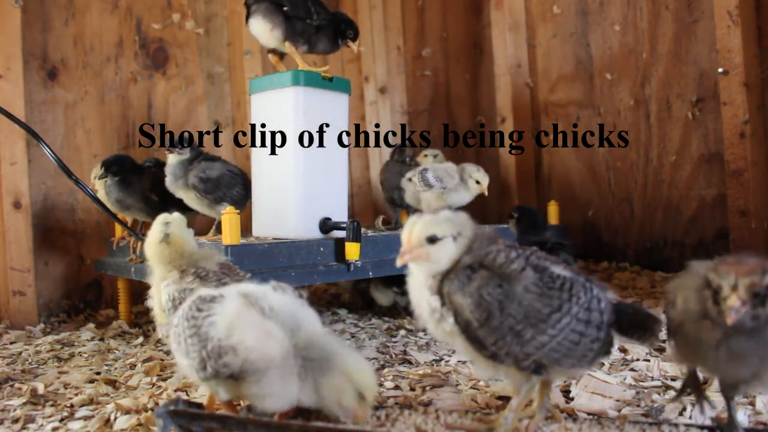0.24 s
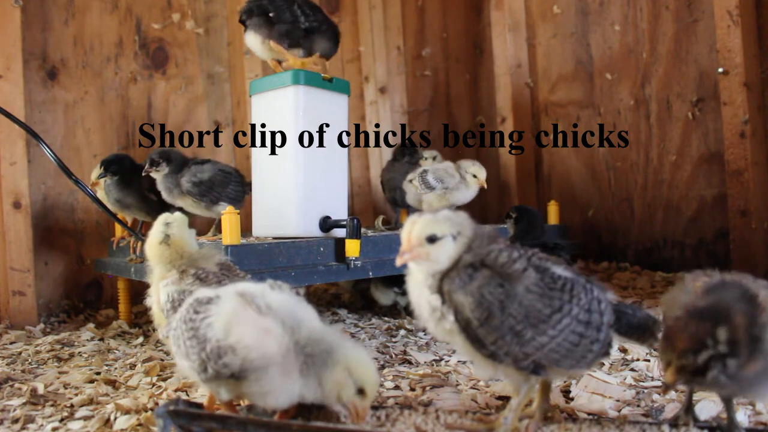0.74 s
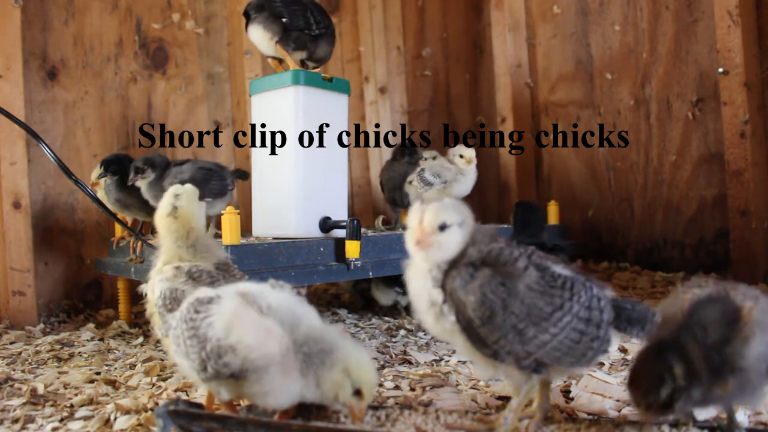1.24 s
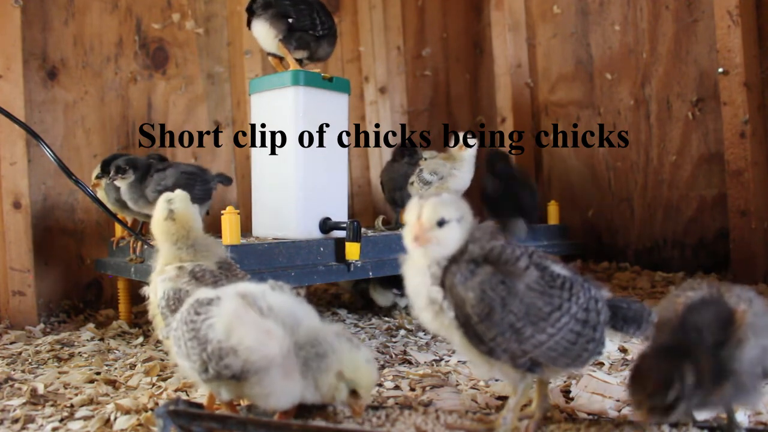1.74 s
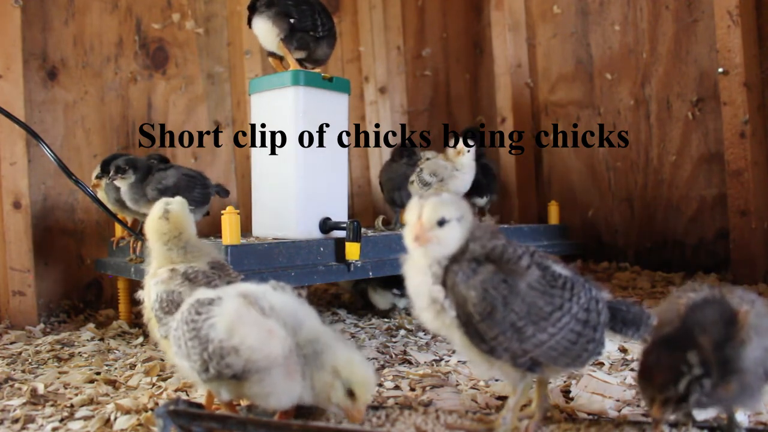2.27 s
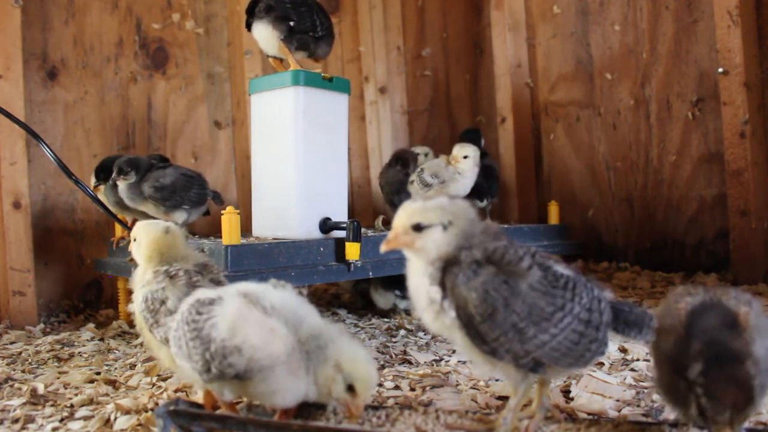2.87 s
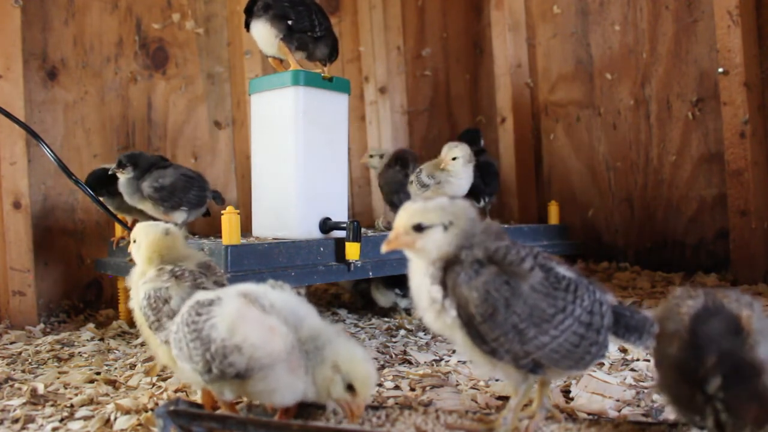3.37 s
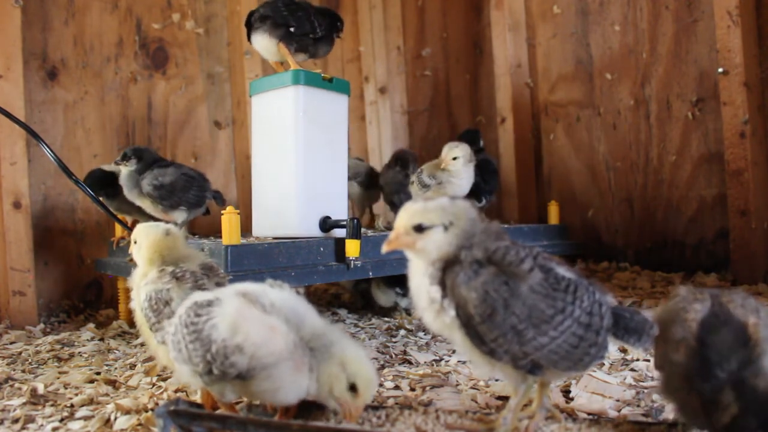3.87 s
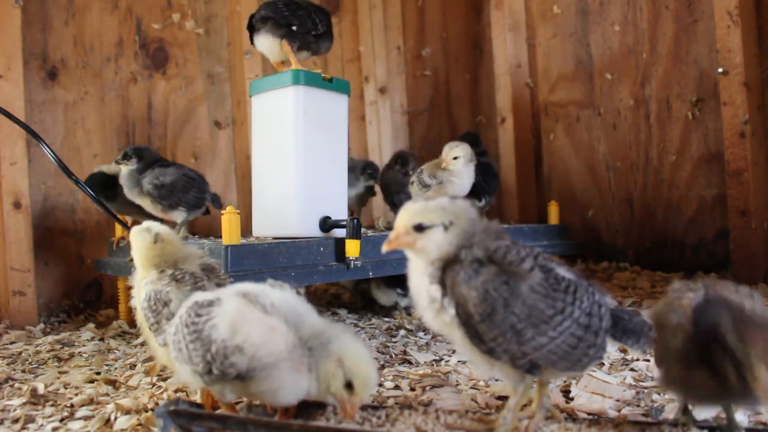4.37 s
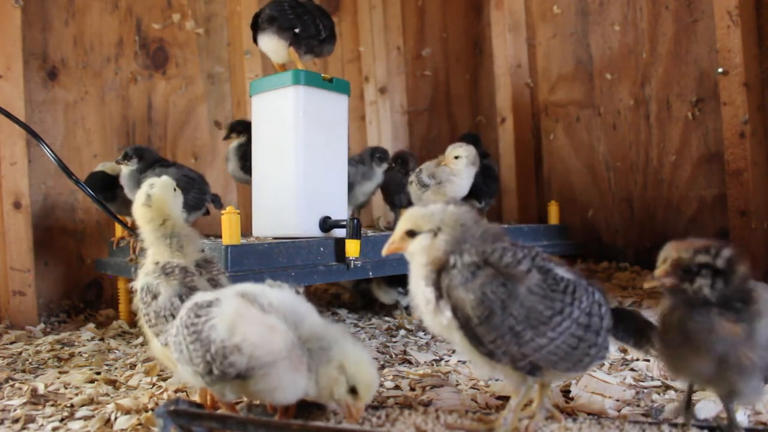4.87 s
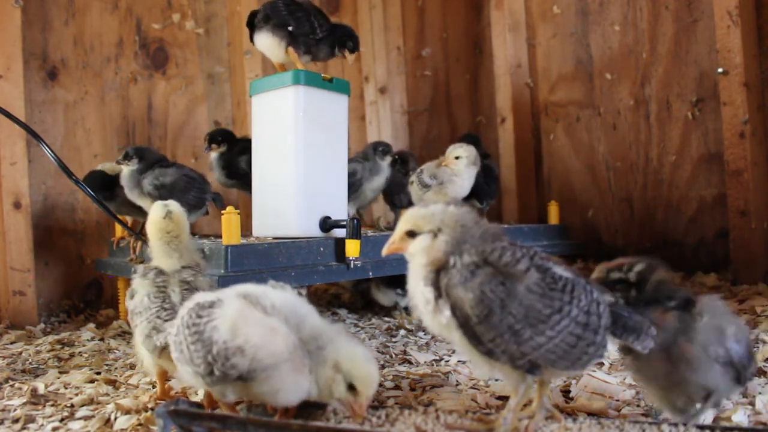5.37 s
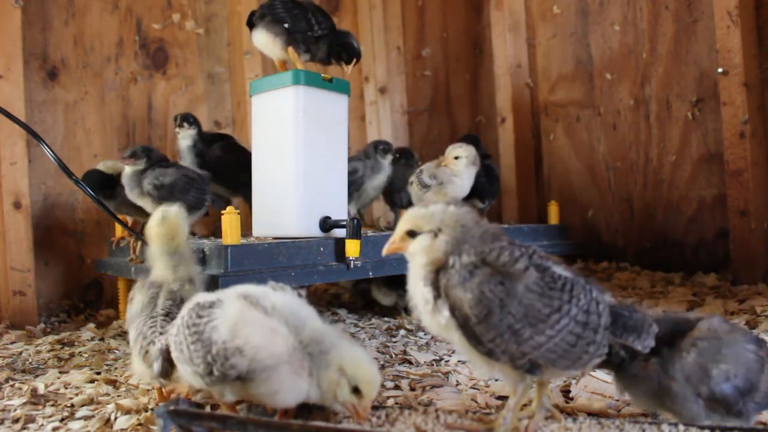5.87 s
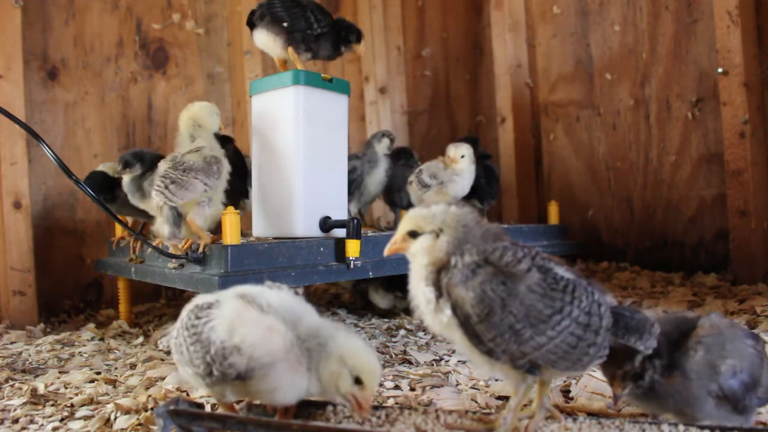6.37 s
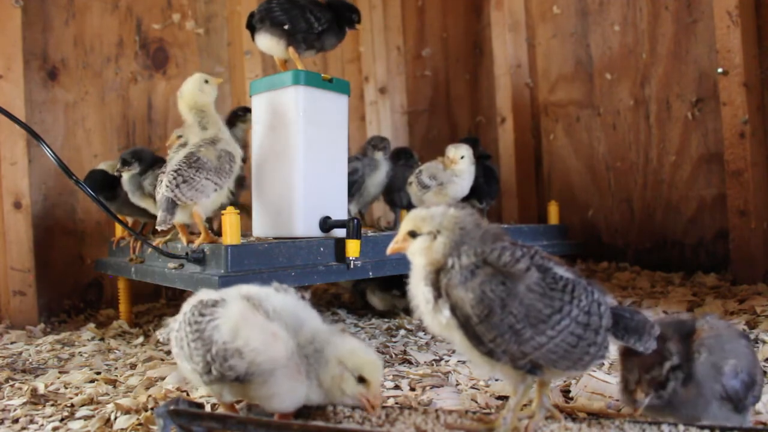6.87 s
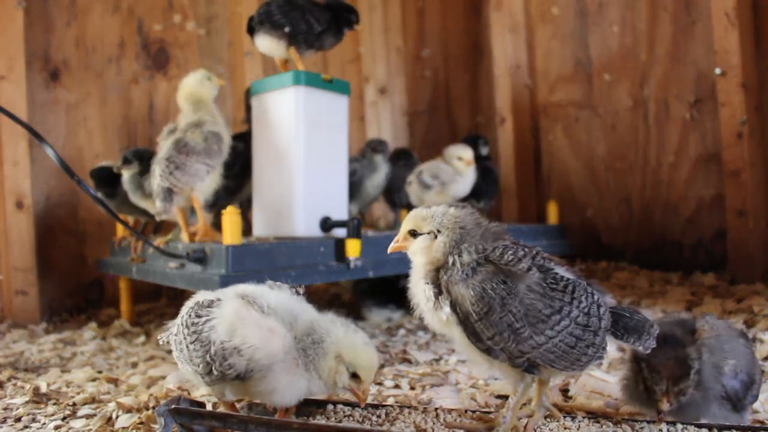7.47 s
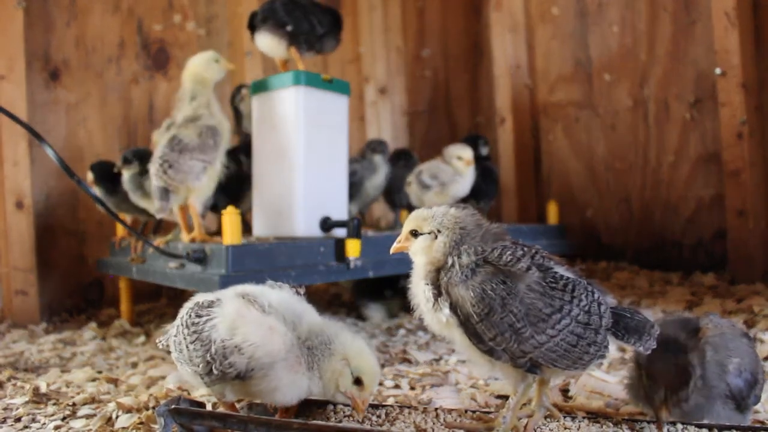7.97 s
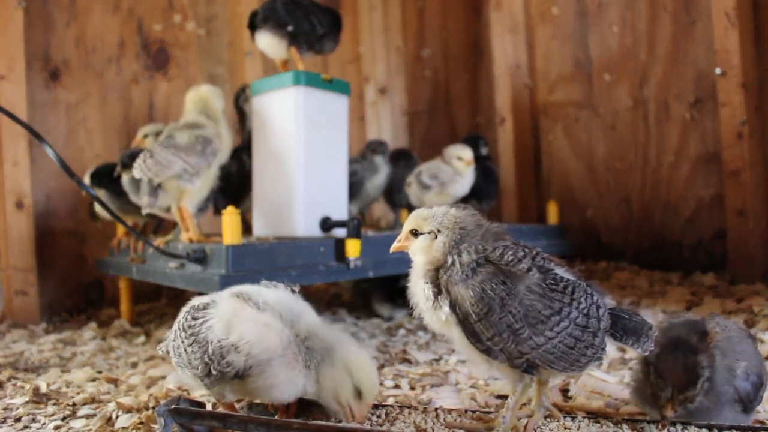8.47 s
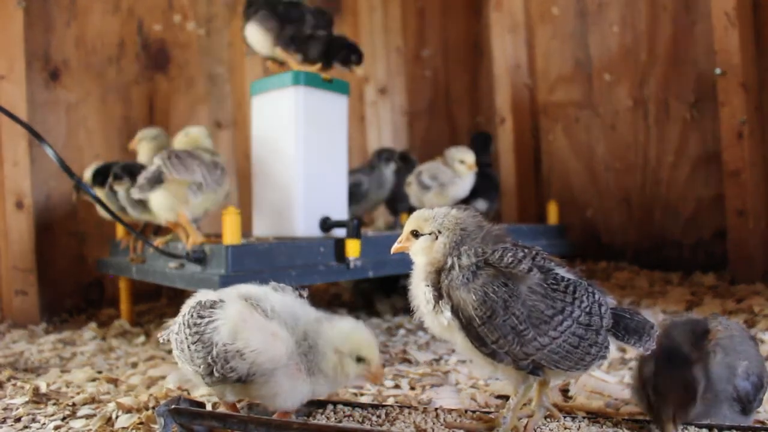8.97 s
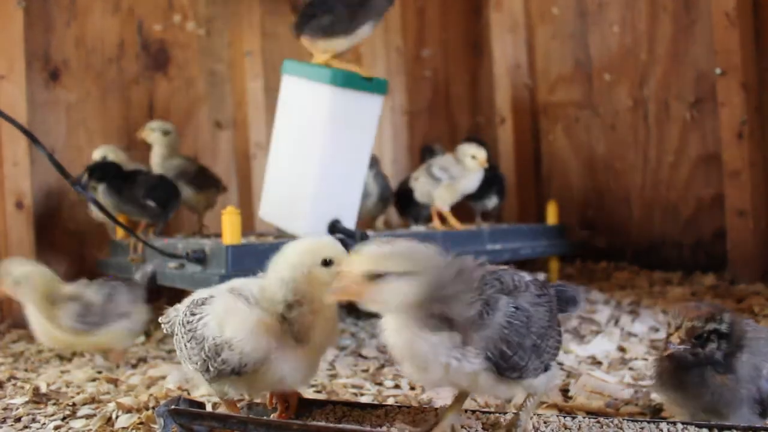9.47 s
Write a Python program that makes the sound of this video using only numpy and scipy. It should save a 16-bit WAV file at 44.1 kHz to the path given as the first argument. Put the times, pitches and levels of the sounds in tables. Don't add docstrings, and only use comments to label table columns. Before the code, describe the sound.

Mostly quiet chick bustle on dry litter, close up with a short woody room echo. Uneven rustles, sharp ticks, small tray taps and dull footfalls continue for almost nine seconds, with sparse falling chirps. Outside, a far bird calls softly, an insect buzzes twice and a motor hums low. Then sudden flapping, bright feather ticks, hollow knocks and loud arching squeals run to the cut.

```python
import sys
import numpy as np
from scipy import signal
from scipy.fft import rfft, irfft
from scipy.io import wavfile
from scipy.ndimage import uniform_filter1d, map_coordinates

SR = 44100
rng = np.random.default_rng(int(sys.argv[2]) if len(sys.argv) > 2 else 0)


def materialize(psi):
    bounded = np.clip(np.atleast_2d(psi).T, -1, 1)
    quanta = np.round(bounded * 32767).astype(np.int16)
    wavfile.write(sys.argv[1], SR, quanta)


def invert_db(level):
    return 10 ** (np.asarray(level, dtype=float) / 20)


N = 429093


def evened(x):
    return x / np.sqrt(np.mean(x ** 2) + 1e-20)


def read(points, hz):
    f, value = np.transpose(points)
    return np.interp(np.log(hz + 1), np.log(f + 1), value)


def add(mix, s, sound):
    part = mix[round(s * SR):][:len(sound)]
    part += sound[:len(part)]


def follow(rows):
    s, *columns = np.transpose(rows)
    t = np.arange(s[0], s[-1], 1 / SR)
    return [t] + [np.interp(t, s, c) for c in columns]


def coloured(x, spectrum):
    gain = invert_db(read(spectrum, np.fft.rfftfreq(len(x), 1 / SR)))
    return evened(irfft(rfft(x) * gain, len(x)))


def wander(n, hz):
    knots = rng.standard_normal(int(n / SR * 400) + 8)
    return map_coordinates(knots, [np.arange(n) * np.clip(hz, 1, 400) / SR], order=2)


def phase(hz):
    return 2 * np.pi * np.cumsum(hz) / SR


def ring(hz, t60):
    t = np.arange(SR // 4) / SR
    return invert_db(-60 * t / t60) * np.sin(2 * np.pi * hz * t)


def crackle(n, per_s, spread_db, hiss):
    size = invert_db(spread_db * np.minimum(rng.exponential(1, n), 4)) * rng.standard_normal(n)
    return size * (rng.random(n) < per_s / SR) + hiss * rng.standard_normal(n)


def whistle(hz, db, octave_db):
    turn = phase(hz)
    tremor_db = 3 * wander(len(hz), 224.3)
    return invert_db(db + tremor_db) * (np.sin(turn) + invert_db(octave_db) * np.sin(2 * turn))


# t/s, level/dB
ECHOES = [(.0021, -71), (.0047, -43), (.0073, -27), (0.0122, -26.5), (.0168, -22), (.0235, -45)]
# f/Hz, t60/s
SHED = [(90, 0.42), (300, 0.15), (1000, 0.11), (4000, 0.12), (12000, 0.083)]


def shed(x, tail_db):
    taps = np.zeros(SR // 2)
    at = np.arange(200, SR // 2 - 20, 20)
    taps[at + rng.integers(0, 20, len(at))] = rng.choice([-1., 1.], len(at))
    hz, t, z = signal.stft(taps, SR, nperseg=256)
    tail = signal.istft(z * invert_db(-60 * t / read(SHED, hz)[:, None]), SR, nperseg=256)[1]
    room = invert_db(tail_db) * tail / np.linalg.norm(tail)
    direct = (0.0015, 0.038)
    for k, (s, db) in enumerate([direct, *ECHOES]):
        add(room, s, np.array([(-1) ** k * invert_db(db)]))
    return signal.fftconvolve(x, room / np.linalg.norm(room))[:N]


# f/Hz, level/dB per Hz
FLOOR = [(20, -5.5), (66, 3), (92, 4), (135, -4), (335, -12.5), (700, -11), (2400, -23.5), (15800, -23)]


def floor():
    return invert_db(-55 + 0.054 * wander(N, 3.6)) * coloured(rng.standard_normal(N), FLOOR)


# t/s, f/Hz, level/dB
MOTOR = [
    (3.1, 49.97, -66),
    (3.45, 40.05, -58),
    (3.7, 43.5, -62),
    (6.2, 42.11, -56.5),
    (8.53, 42.42, -55.5),
    (8.86, 40.9, -50),
    (9.73, 41.5, -54),
]


def motor():
    out = np.zeros(N)
    t, hz, db = follow(MOTOR)
    octave_db = -55 + 0.085 * (db + 63)
    turn = phase(hz)
    hum = invert_db(db + 5.5) * np.sin(turn)
    octave = invert_db(octave_db + 0.5 + 1.47 * wander(len(t), 9.4)) * np.sin(2 * turn)
    add(out, t[0], (hum + octave) * np.clip((t - t[0]) / 0.63, 0, 1))
    return out


# t/s, length/s, f/Hz, level/dB
INSECT = [
    (3.032, 0.28, 6706, -64),
    (3.464, 0.37, 6515, -63),
]


def insect():
    out = np.zeros(N)
    for s, length, start_hz, db in INSECT:
        t = np.arange(s, s + length, 1 / SR)
        hz = start_hz - 1100 * (t - s) ** 2
        db = db - 9 * (1 - (t - s) / length) ** 2
        fuzz = evened(uniform_filter1d(uniform_filter1d(rng.standard_normal(len(t)), 50), 30))
        add(out, t[0], invert_db(db + 5.0) * fuzz * np.sin(phase(hz)) * signal.windows.tukey(len(t), .3))
    return out


# t/s, length/s, top of the second harmonic f/Hz, level/dB, place of the swell (0-1)
FAR_BIRD = [(0.02, 0.228, 1860, -59, 0.5), (0.345, 0.14, 1893, -53.5, 0.74), (0.52, 0.05, 1846, -63, 0.3),
            (2.025, 0.23, 1871, -56, 0.43), (2.335, 0.17, 1886, -55.5, 0.7),
            (2.53, 0.041, 1850, -60.5, 0.28), (2.23, 0.12, 1830, -63.5, 0.45), (4.44, 0.11, 1849, -60, 0.5),
            (0.24, 0.11, 1796, -67.5, 0.4), (4.23, 0.225, 1853, -57, 0.3), (4.52, 0.2, 1864, -56.5, 0.6),
            (7.065, 0.24, 1874, -60, .6), (7.385, 0.19, 1860, -57.5, 0.58)]
# multiple, level/dB
FAR_BIRD_ORDERS = [(2, 1), (3, -3), (6, -12), (7, -14)]


def far_bird():
    out = np.zeros(N)
    for s, length, top_hz, db, swell in FAR_BIRD:
        t = np.arange(s, s + length, 1 / SR)
        u = (t - s) / length
        below_top = np.interp(u, [0, 0.43, 0.813, 1], [0.0206, 0, 0.03133, 0.03133])
        hz = top_hz * (1 - below_top)
        db = db - 10 * (u - swell) ** 2 * 2
        turn = phase(hz * (1 + 0.0052 * wander(len(t), 24.6))) / 2
        note = sum(invert_db(d + 3.3 * wander(len(t), 105)) * np.sin(k * turn) for k, d in FAR_BIRD_ORDERS)
        add(out, t[0], invert_db(db - 0.5) * note * signal.windows.tukey(len(t), .1))
    return shed(out, tail_db=-2)


# t/s, level/dB
BUSTLE = [(0, -55.5), (0.6, -56.5), (1.4, -58.5), (1.75, -50), (2.07, -60.5), (2.45, -52.5), (3, -57.5),
          (3.42, -62), (3.7, -59.5), (4.3, -53.5), (5.2, -54), (5.75, -51), (6.3, -56), (6.75, -51.5),
          (7.15, -52), (8, -57), (8.3, -61.5), (8.75, -54)]
# t/s of the peak, level/dB, length/s
RAKES = [(0.335, -49.5, 0.154), (0.738, -49, 0.285), (1.785, -47.5, 0.061), (2.675, -51, 0.13),
         (2.908, -51, 0.11), (4.087, -44.5, 0.083), (4.748, -50, 0.052), (5.114, -45, 0.07),
         (5.795, -48, 0.032), (6.044, -45, 0.07), (6.442, -49, 0.135), (6.627, -42, 0.038),
         (6.719, -51, 0.17), (6.871, -43.5, 0.036), (8.143, -46.5, 0.257), (8.833, -48.5, 0.234)]
# f/Hz, level/dB per Hz
SHAVINGS = [(290, 3.5), (500, -2), (1030, 2), (2420, 3.5), (3670, 2), (8010, 1.5), (12700, -3.5),
            (15800, -3.5)]


def stirring():
    t = np.arange(N) / SR
    power = invert_db(np.interp(t, *np.transpose(BUSTLE))) ** 2 * (t < 8.9)
    rise = 0.223
    for s, db, length in RAKES:
        away = np.maximum((s - t) / rise, (t - s) / (1 - rise)) / length
        power = power + invert_db(db - 11.5 * away) ** 2
    grains = coloured(crackle(N, 6000, spread_db=4.5, hiss=0.846), SHAVINGS)
    return np.sqrt(power) * invert_db(2.17 * wander(N, 60)) * grains


# t/s, peak level/dB, centre f/Hz
SNAPS = [(0.2976, -11.5, 2500), (0.7228, -33, 5470), (0.737, -25.5, 7760), (0.7905, -21.5, 2400),
         (0.852, -25.5, 3160), (1.601, -21, 4470), (1.611, -29, 7650), (1.6523, -20, 7250),
         (1.732, -26, 7890), (1.7904, -15.5, 6230), (2.329, -25, 3660), (4.0906, -35, 3450),
         (4.728, -32, 5600), (5.098, -26.5, 4620), (5.1215, -40, 3967), (5.808, -28.5, 7760),
         (6.0641, -24.5, 6680), (6.158, -28, 10540), (6.3669, -26.5, 10470), (6.627, -20.5, 2650),
         (6.865, -46, 3740), (7.876, -34, 2680), (7.9866, -30, 6460), (8.091, -36.5, 3400),
         (8.1598, -26, 4330), (8.257, -20.5, 5120), (8.45, -28, 4070), (3.262, -33, 3000),
         (3.463, -31, 2300), (3.68, -35, 3200), (3.887, -32, 4000), (4.152, -34, 2600), (4.18, -31, 2400),
         (4.228, -37, 2600)]


def snaps():
    out, t = np.zeros(N), np.arange(800) / SR
    click = 1. * (t == 0)
    tick = signal.lfilter(*signal.butter(1, 900, "high", fs=SR), click)
    for s, db, hz in SNAPS:
        burst = rng.standard_normal(800) * invert_db(-9.0 - 60 * t / 0.04) + 3.2 * click
        band = signal.butter(2, np.clip([hz * 0.55, hz * 1.406], 300, 20000), "band", fs=SR)
        add(out, s, invert_db(db - 5.5) * (signal.lfilter(*band, burst) + invert_db(0.5) * tick))
    return out


# f/Hz, level/dB, t60/s
BOARDS = [(96, -5, 0.36), (170, -8, 0.14), (250, 1.5, 0.09), (370, 1, 0.07)]


def blow(modes, db, hz, crack_db, thump_db):
    t = np.arange(SR // 4) / SR
    nearest_hz = min((row[0] for row in modes), key=lambda f: abs(np.log(f / hz)))
    bend = hz / nearest_hz
    body = np.zeros(len(t))
    for f, mode_db, t60 in modes:
        strength, detune = rng.uniform(-0.56, 1, 2)
        focus_db = -13 * abs(np.log2(bend * f / hz))
        body += invert_db(mode_db + 3.5 * strength + focus_db) * ring(bend * f * (1 + 0.0371 * detune), t60)
    body *= 1 - np.exp(-t / 0.0016)
    crack_band = signal.butter(2, [1600, 4800], "band", fs=SR)
    crack = signal.lfilter(*crack_band, 1.078 * rng.standard_normal(len(t)) * invert_db(-60 * t / 0.023))
    thump = sum(invert_db(d) * ring(f, t60) * (1 - np.exp(-t * f / 4)) for f, d, t60 in BOARDS)
    return invert_db(db - 1.5) * (body / abs(body).max() + invert_db(crack_db) * crack + invert_db(thump_db - 1.5) * thump)


# f/Hz, level/dB, t60/s
TRAY = [(376, 0.5, 0.041), (489, -14, 0.083), (636, 4.5, 0.032), (731, 3.5, 0.0392), (841, 9, 0.02),
        (1050, 12.5, 0.01936), (1161.7, -7, 0.0597), (1397, 17, 0.0092), (1716, 16, 0.0085),
        (2050, 7.5, 0.017), (2450, 4, 0.0224), (2750, 11.5, 0.0081)]
# t/s, peak level/dB, ring f/Hz
PECKS = [(1.136, -41, 1094), (2.338, -46, 620), (3.3, -37, 1147), (3.615, -38, 810), (3.811, -43.5, 942.8),
         (4.823, -34, 1188), (5.014, -38.5, 1200), (5.277, -36.5, 942), (5.637, -37, 952),
         (5.897, -42, 841.2), (6.402, -43, 900), (6.625, -26.5, 2812), (7.684, -45, 780),
         (7.745, -43, 1023), (8.056, -37, 1490), (8.487, -43, 696), (0.2964, -26, 2090), (.312, -24.5, 713),
         (.327, -34, 1869), (1.137, -39, 1820), (3.617, -40, 1955), (1.28, -54, 541), (1.41, -52, 495),
         (1.566, -38.5, 900), (1.842, -50, 660), (2.605, -50, 678.6), (0.864, -31, 1050), (3.511, -51, 668),
         (3.745, -52.5, 681), (4.178, -45, 678), (5.246, -45, 660), (5.363, -52, 503), (6.53, -46, 845),
         (6.611, -58.5, 710), (6.872, -46, 416.5), (7.774, -43, 1034), (7.845, -45, 1034),
         (7.894, -36, 670), (8.118, -39, 800), (8.14, -44, 1000), (8.159, -39, 2030), (8.579, -44, 782),
         (9.067, -26, 382.4), (9.394, -36.5, 329), (9.55, -23, 410)]


def pecks():
    out = np.zeros(N)
    for s, db, hz in PECKS:
        add(out, s, blow(TRAY, db, hz, crack_db=-7, thump_db=-16.5))
    return out


# t/s, peak level/dB, ring f/Hz, crack level/dB, thump level/dB
KNOCKS = [(0.295, -14.5, 627, -26.5, -4), (0.791, -27.5, 1970, -2, -26), (0.859, -21.5, 808, -34, -13.5),
          (1.611, -33.5, 1841, -2, -28), (1.891, -29, 939, -26, -6), (2.006, -38, 920, -35, -4.5),
          (3.57, -38.5, 938, -23, -2.5), (3.922, -33.5, 531.5, 0.5, -4), (4.091, -38, 1700, 2.5, -16),
          (4.407, -32, 1050, -3, -12), (4.571, -26, 630, -25, -20.5), (4.957, -36, 1020, -30, -9),
          (5.12, -35.5, 1005, -18, -8.5), (6.011, -41, 736, 7, -17), (6.143, -36.5, 1140, -1.5, -6),
          (6.656, -26.5, 1170, -18, 0.5), (6.821, -35.5, 784, -16, -10), (7.039, -31.5, 1004, -8, -5),
          (7.878, -28, 2050, 0, -22), (8.09, -33.5, 1293, 11.5, -27.5), (8.269, -31, 967, 12, -24),
          (8.616, -36.5, 490, 4, -15.5)]


def knocks():
    out = np.zeros(N)
    for s, *hit in KNOCKS:
        add(out, s, blow(TRAY, *hit))
    return out


# f/Hz, level/dB, t60/s
FEEDER = [(245, -2.5, 0.0835), (374, 1.5, 0.0338), (619, -5.5, 0.04), (721.2, 5, 0.027),
          (902.8, -5.5, 0.0553), (1040, 4.5, 0.034), (1397, 1.5, 0.033), (2037, 5, 0.021), (2450, -1, .02)]
# t/s, peak level/dB, ring f/Hz, crack level/dB, thump level/dB
BUMPS = [(8.878, -21, 584, -2, -3), (8.885, -31.5, 180, -20, 1), (8.975, -32, 852, 2, -24),
         (9.019, -24, 1021, -23, -4), (9.136, -20, 727, -0.5, -9.5), (9.207, -20, 800, -16.5, 0),
         (9.229, -21, 640, 0, -21), (9.2717, -5.5, 2076, -19, -30), (9.2728, -5, 727, -19, -31),
         (9.272, -7, 1040, -22.5, -27), (9.274, -7, 367, -31, -21), (9.462, -34.5, 900, 1, -4),
         (9.519, -28.5, 617, 7.5, 6), (9.629, -13.5, 626.5, -17, -31), (9.643, -15, 730, -10, -15),
         (9.689, -9, 731, -4, -13.5), (9.704, -16, 620, 0, -7), (9.288, -19, 245, -20, -20),
         (9.44, -27, 344.5, -15, -11), (9.461, -23.5, 350, -12, -15), (9.606, -24.5, 315, -15, -14),
         (9.644, -15, 380, -15, -12), (9.684, -21.5, 282, -19.5, -17), (9.7, -16.5, 245, -20, -18),
         (9.64, -17, 917, -10, -20)]


def bumps():
    out = np.zeros(N)
    for s, *hit in BUMPS:
        add(out, s, blow(FEEDER, *hit))
    return out


# t/s, length/s, start f/Hz, end f/Hz, level/dB
PEEPS = [(1.374, 0.0197, 3820, 2750, -50), (4.04, 0.022, 3260, 2450, -38.5),
         (4.367, 0.016, 2880, 3054, -54), (4.679, 0.0072, 3108, 2900, -46), (5.28, 0.036, 3274, 2810, -50),
         (6.183, 0.017, 4020, 4140, -52), (6.193, 0.0357, 4005, 2760, -45.5),
         (6.312, 0.0213, 3460, 2986, -50), (6.432, 0.033, 4140, 2800, -52),
         (6.567, 0.029, 3830, 2670, -47.5), (6.651, 0.044, 2560, 2988, -47.5),
         (7.025, 0.023, 4261, 4370, -44.5), (7.041, 0.036, 4250, 3300, -54),
         (7.062, 0.0183, 3270, 3440, -57), (7.307, 0.0424, 4440, 2670, -51),
         (7.792, 0.0279, 3410, 3070, -61), (7.823, 0.031, 2836, 3283, -47), (8.335, 0.027, 3072, 2700, -51),
         (8.582, 0.011, 4080, 3890, -54.5), (9.023, 0.0091, 4770, 5100, -39),
         (9.059, 0.0037, 2544, 2400, -18.5), (9.063, 0.0096, 2340, 2671, -20),
         (9.061, 0.0094, 4810, 4867, -32), (9.068, 0.024, 2360, 2190, -43),
         (9.321, 0.0106, 5630, 4900, -40), (9.36, 0.0072, 3520, 3230, -38.5),
         (9.619, .005, 3587, 2890, -36), (9.649, 0.0036, 3500, 3000, -33), (9.704, 0.022, 2638, 2662, -26),
         (9.7, 0.024, 5237, 5440, -36)]


def peeps():
    out = np.zeros(N)
    for s, length, start_hz, end_hz, db in PEEPS:
        u = np.arange(int(length * SR)) / (length * SR)
        sag_hz = 0.03 * start_hz * np.sin(np.pi * u)
        hz = start_hz + (end_hz - start_hz) * u - sag_hz
        level_db = db + 4.5 - 1.7 * np.log2(hz / hz.mean())
        add(out, s, whistle(hz, level_db, octave_db=-28.5) * signal.windows.tukey(len(u), .3))
    return out


# t/s, swish level/dB, slap level/dB, length/s
STROKES = [(8.829, 1.5, -9, 0.013), (8.877, 11, -5, 0.0112), (8.905, 7.5, 7, 0.024),
           (8.963, 6.5, -5, 0.019), (8.994, 2.5, 5.5, 0.0186), (9.026, -1, -1, 0.017),
           (9.053, 0.5, 5.5, 0.025), (9.065, 0, 4.5, 0.013), (9.131, 3.5, 4.5, 0.02),
           (9.159, 0.5, 7, 0.0186), (9.21, 4, 10.5, 0.0194), (9.225, 6, 10.5, 0.017),
           (9.28, 10.5, 9.5, 0.0175), (9.323, 1.5, -6, 0.017), (9.361, 1.5, 0.5, 0.024),
           (9.397, -1, 1.5, 0.0294), (9.434, 2.5, 2, .02), (9.46, 6, 11.5, 0.0104),
           (9.477, 4.5, -15, 0.0275), (9.526, 3, -6, 0.019), (9.553, 5.5, 3.5, 0.0216),
           (9.593, -0.5, 7.5, 0.0393), (9.629, -6.5, 4, 0.019), (9.645, 2, 7, 0.0287),
           (9.686, -6.5, -1, 0.013), (9.69, 1, 3, .015), (9.704, -3.5, 5, 0.0163)]


def beats(t, column):
    power = invert_db(-6.5) ** 2
    for row in STROKES:
        away = (t - row[0]) / row[3]
        power = power + invert_db(row[column]) ** 2 * np.exp(-np.where(away < 0, 2.55 * away, away) ** 2)
    return np.sqrt(power)


# t/s, level/dB
FLAPPING = [
    (8.78, -54),
    (8.85, -52.5),
    (9.1, -42.5),
    (9.29, -39.5),
    (9.366, -42),
    (9.5, -41.5),
    (9.6, -38.5),
    (9.66, -30.5),
    (9.73, -28),
]
# t/s, level/dB
DOWNSTROKES = [
    (8.88, -39),
    (9.06, -33.5),
    (9.13, -31),
    (9.29, -48),
    (9.51, -30.5),
    (9.601, -25),
    (9.69, -33),
]
# f/Hz, level/dB per Hz
FEATHERS = [(71, -37), (120, 1.5), (416, 0), (507, -5.5), (780, 0), (1000, -2.5), (6000, -19.5),
            (13200, -100)]
# f/Hz, level/dB per Hz
SWISH = [(2000, -1.5), (2590, -5.5), (3110, -7), (4360, -9.5), (7800, -4), (10000, -14.5), (13400, -9.5),
         (15800, -22)]


def wings():
    t, swish_db = follow(FLAPPING)
    slap_db = -45.0 + 0.903 * (swish_db + 44.5)
    push = invert_db(-46 + 0.383 * (swish_db + 42))
    push_s = 0.0806
    for s, db in DOWNSTROKES:
        push = push + invert_db(db) * np.exp(-((t - s) / push_s * 2) ** 2)
    strokes = invert_db(3.3 * wander(len(t), 120))
    scuffs = crackle(len(t), 1400, spread_db=2.3, hiss=0.2)
    slaps = coloured(strokes * beats(t, column=2) * scuffs, FEATHERS)
    low_air = [(40, -25), (70, -2.0), (95, 14.0), (130, -9.0), (300, -23.5)]  # f/Hz, level/dB per Hz
    air = coloured(rng.standard_normal(len(t)), low_air)
    grains = crackle(len(t), 2500, spread_db=3.5, hiss=0.27)
    swish = coloured(strokes * beats(t, column=1) * grains, SWISH)
    out = np.zeros(N)
    add(out, t[0], invert_db(slap_db + 5.0) * slaps + invert_db(-7.0) * push * air + invert_db(swish_db + 5.0) * swish)
    return out


# t/s, peak level/dB
QUILLS = [(8.8013, -31), (8.9669, -19), (9.0497, -27), (9.1086, -26), (9.2004, -24), (9.278, -20.5),
          (9.4465, -19.5), (9.494, -18.5), (9.5937, -27), (9.6056, -24), (9.6386, -9.5), (9.6755, -5.5),
          (9.6455, -11), (9.6575, -10), (9.662, -18), (9.325, -26), (9.392, -30), (8.878, -30),
          (8.908, -33.5), (9.309, -26), (9.318, -26), (9.481, -20.5), (9.5, -29.5), (9.5518, -29),
          (9.56, -27), (9.617, -23), (9.651, -18), (9.667, -11.5), (9.682, -15), (9.692, -16),
          (9.6975, -16), (9.704, -22), (9.71, -19), (9.718, -18), (9.721, -20)]


def quills():
    out, t = np.zeros(N), np.arange(600) / SR
    for s, db in QUILLS:
        fizz = rng.standard_normal(600) * invert_db(-3.0 - 60 * t / .02)
        add(out, s, invert_db(db - 3.5) * (fizz + 2.8 * (t == 0)))
    return signal.lfilter(*signal.butter(2, (10760, 15200), "band", fs=SR), out)


def trill(dips):
    s, dip_hz, db, top_hz = np.transpose(dips)
    entry_s = 0.0036 + abs(top_hz[0] - dip_hz[0]) / 220000
    s, db = np.r_[s[0] - entry_s, s], np.r_[db[0] - 25, db]
    t = np.arange(s[0], s[-1], 1 / SR)
    place = np.interp(t, s, np.arange(len(s)))
    lean, roundness = 0.84, 0.88
    arch = np.sin(np.pi * (place % 1) ** lean) ** roundness * (place > 1)
    straight_hz = np.interp(t, s, np.r_[top_hz[0], dip_hz])
    hz = straight_hz + arch * (top_hz[place.astype(int)] - straight_hz)
    hz = hz * (1 + .022 * wander(len(t), 323.3))
    level_db = np.interp(t, s, db) - 11 * arch * (1.3 - place % 1) + 4.5
    return t[0] - .002, whistle(hz, level_db, octave_db=-17) * signal.windows.tukey(len(t), .08)


# t/s, dip f/Hz, level/dB, top f/Hz before it
DIPS = [(9.042, 2750, -19, 5220), (9.063, 2816, -17, 4250), (9.093, 3324, -23, 3950),
        (9.112, 2806, -22.5, 4120), (9.134, 2520, -26, 4130), (9.172, 3200, -29.5, 3170),
        (9.192, 3070, -25.5, 4000), (9.214, 3200, -23.5, 3940), (9.229, 3857, -22.5, 4250),
        (9.243, 3036, -43, 3604), (9.262, 2811, -28.5, 3158), (9.29, 2480, -19, 4440),
        (9.312, 3133, -23, 4070), (9.335, 2900, -52.5, 3920), (9.412, 2662, -22, 2620),
        (9.436, 1940, -20, 4150), (9.553, 2665, -26.5, 2645), (9.578, 1910, -18.5, 4250),
        (9.602, 3120, -30, 3817), (9.686, 3920, -19.5, 3922), (9.702, 2440, -15, 3625),
        (9.727, 3160, -16, 3590)]


def squeals():
    out, rows = np.zeros(N), np.array(DIPS)
    breaths = np.flatnonzero(np.diff(rows[:, 0]) > .033) + 1
    for dips in np.split(rows, breaths):
        add(out, *trill(dips))
    return out


def scene():
    outdoors = motor() + insect() + far_bird()
    litter = shed(snaps() + quills() + stirring(), tail_db=-15.5)
    blows = shed(pecks() + knocks() + bumps(), tail_db=-6.0)
    flapping = shed(wings(), tail_db=-15.0)
    voices = shed(peeps() + squeals(), tail_db=-6.5)
    mono = floor() + outdoors + litter + blows + flapping + voices
    return np.array([mono, mono])


def roll_off(x):
    return signal.sosfilt(signal.butter(12, 16800, fs=SR, output="sos"), x)


# f/Hz, level/dB per Hz
MISMATCH = [(24, -30), (40, -4), (397, -1.5), (606, -3.5), (7910, -3.5), (8730, -11), (15500, -36)]


def record(dry):
    side = invert_db(-66.5) * coloured(rng.standard_normal(N), MISMATCH)
    treble = signal.lfilter(*signal.butter(2, 6000, "high", fs=SR), dry[0])
    side = side + invert_db(-30) * np.roll(treble, 37)
    band_limit = signal.firwin(511, 15900, window=("kaiser", 9), fs=SR)
    limited = signal.oaconvolve(dry + [side, -side], band_limit[None], "same")
    return roll_off(limited)


dry = scene()
out = record(dry)
materialize(out)
```